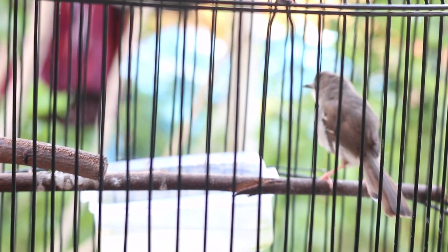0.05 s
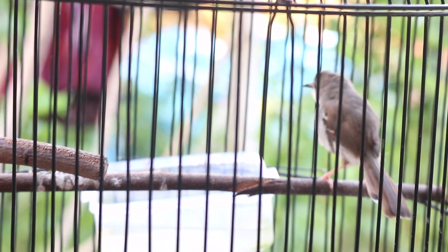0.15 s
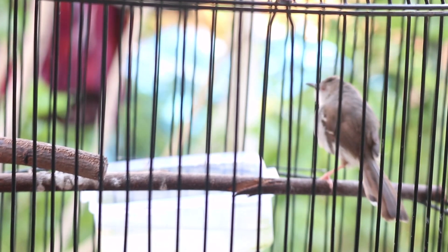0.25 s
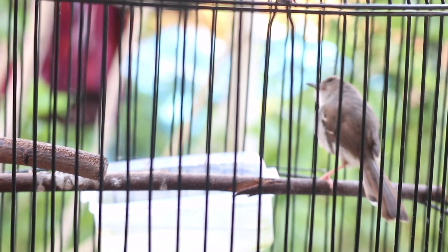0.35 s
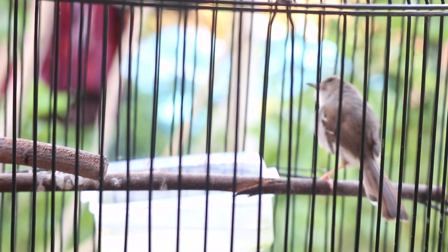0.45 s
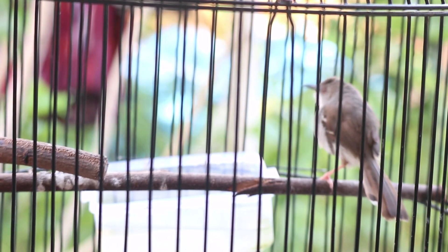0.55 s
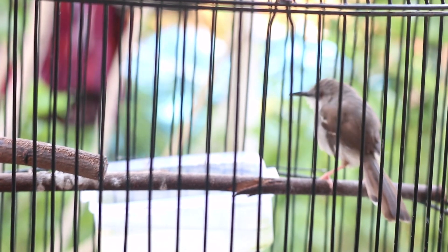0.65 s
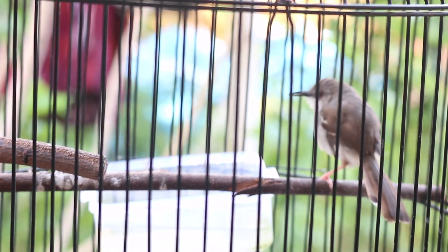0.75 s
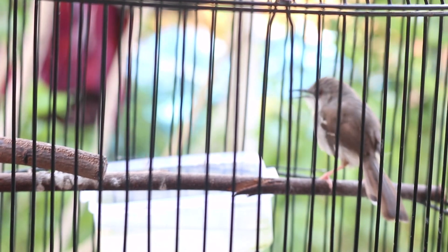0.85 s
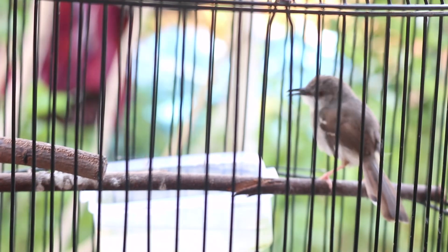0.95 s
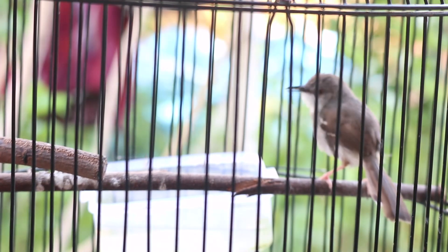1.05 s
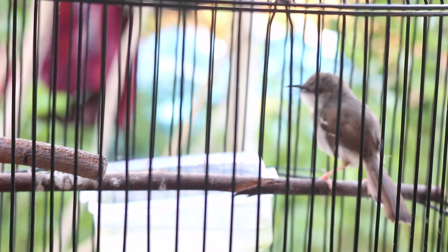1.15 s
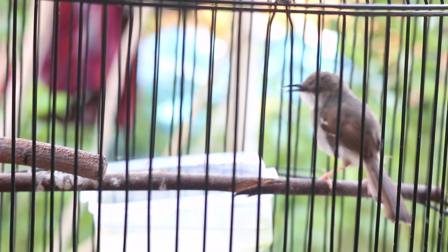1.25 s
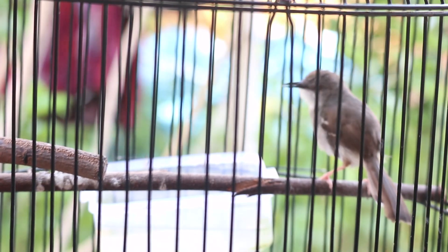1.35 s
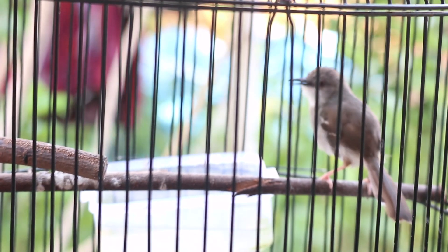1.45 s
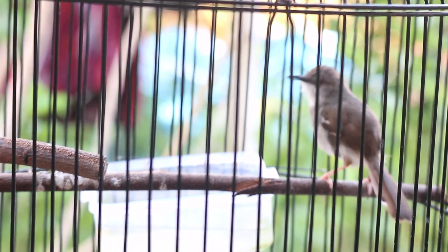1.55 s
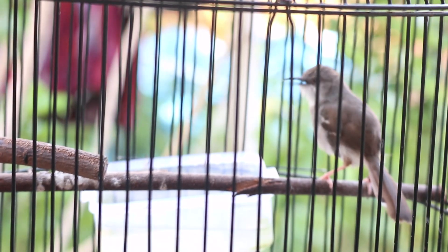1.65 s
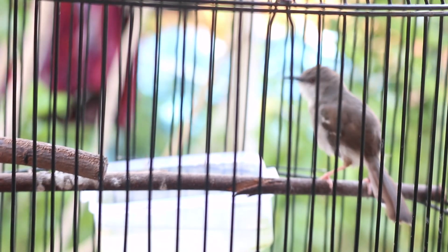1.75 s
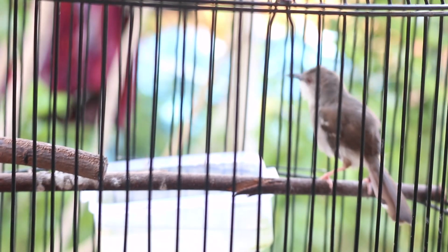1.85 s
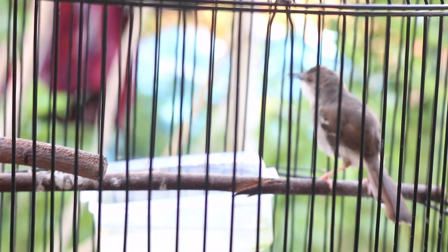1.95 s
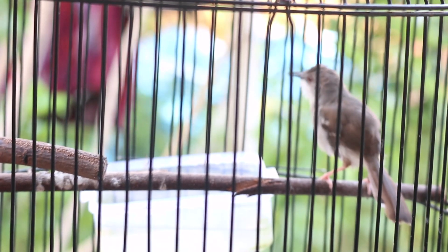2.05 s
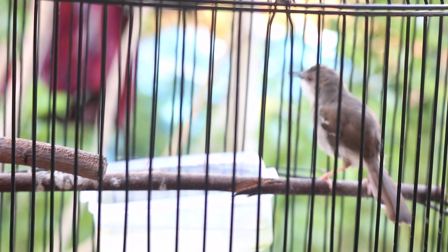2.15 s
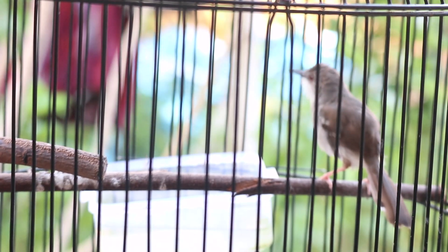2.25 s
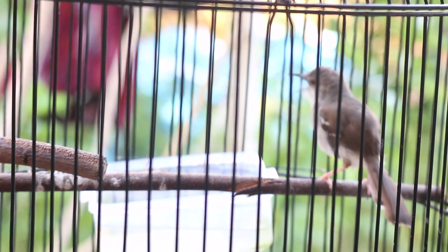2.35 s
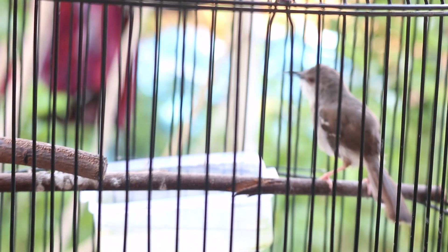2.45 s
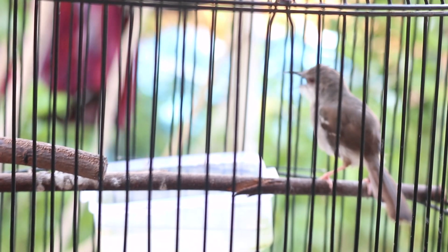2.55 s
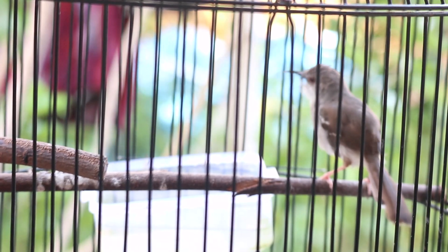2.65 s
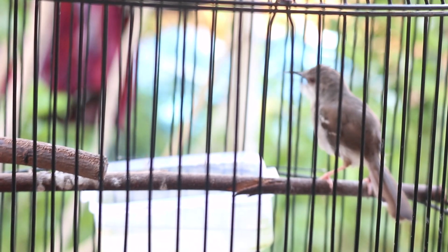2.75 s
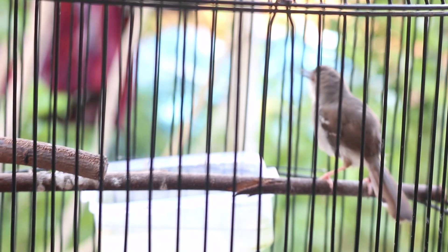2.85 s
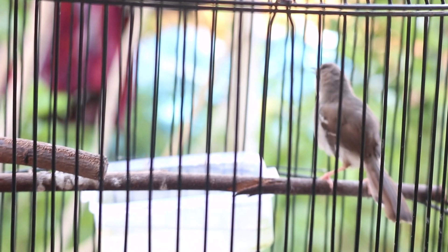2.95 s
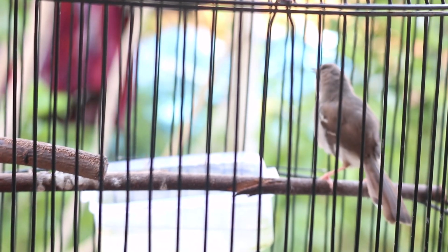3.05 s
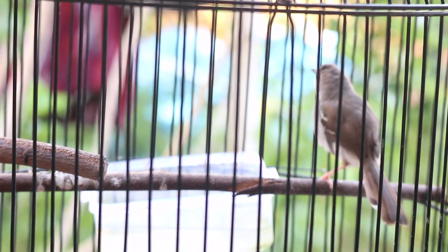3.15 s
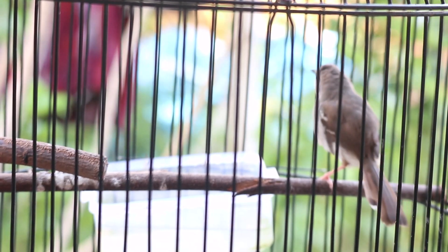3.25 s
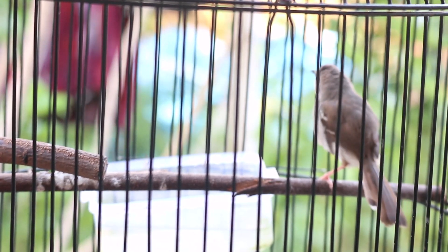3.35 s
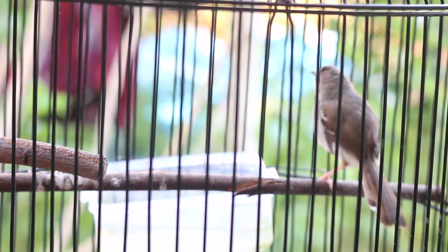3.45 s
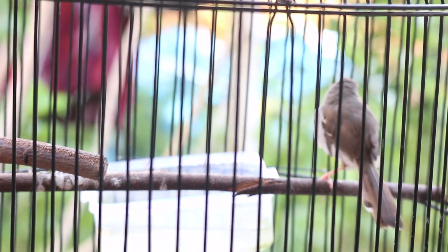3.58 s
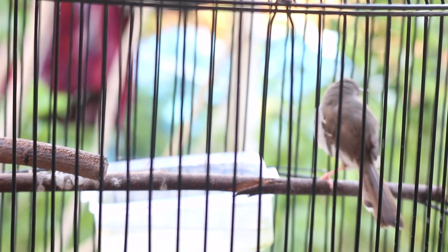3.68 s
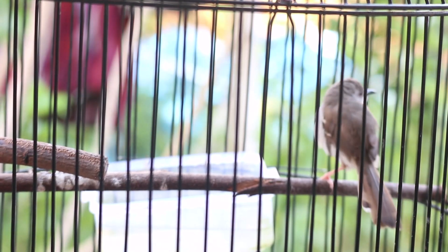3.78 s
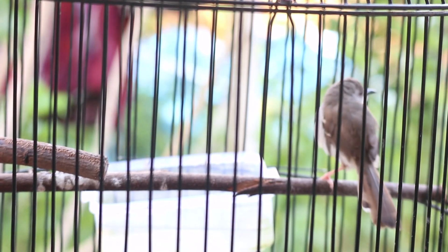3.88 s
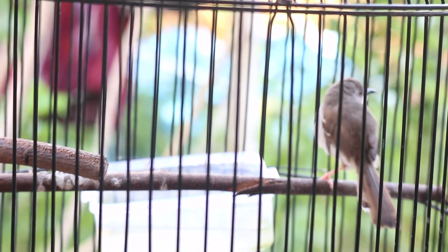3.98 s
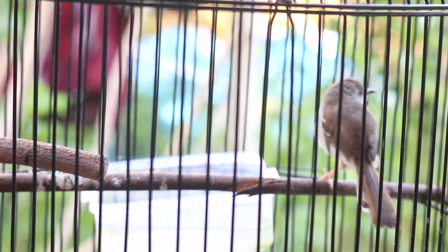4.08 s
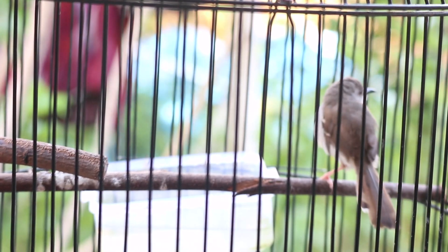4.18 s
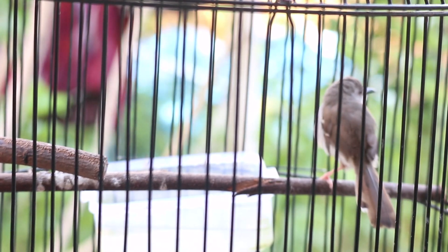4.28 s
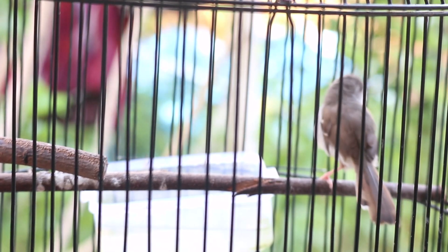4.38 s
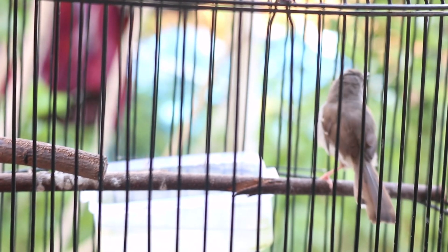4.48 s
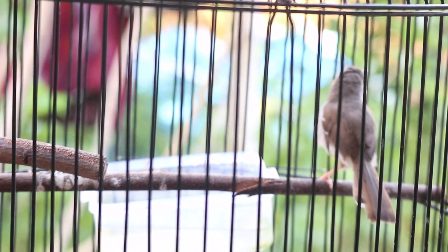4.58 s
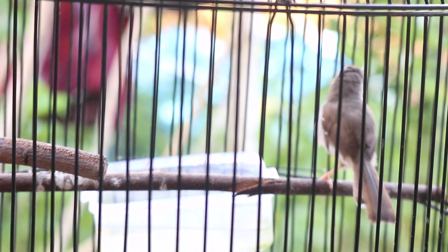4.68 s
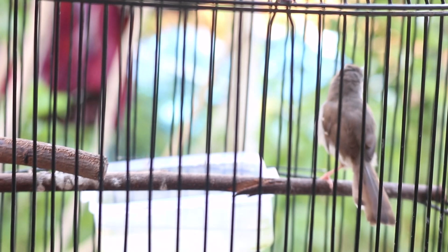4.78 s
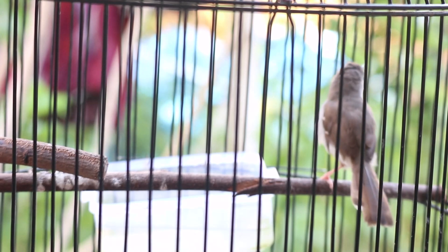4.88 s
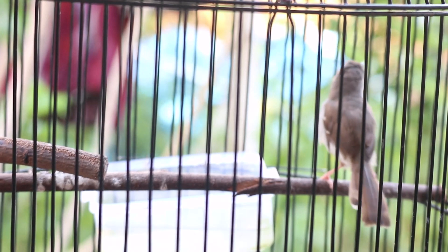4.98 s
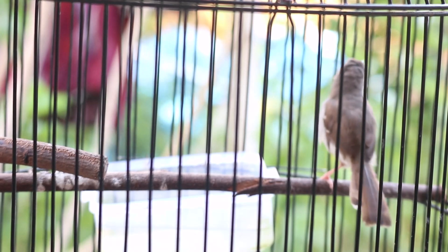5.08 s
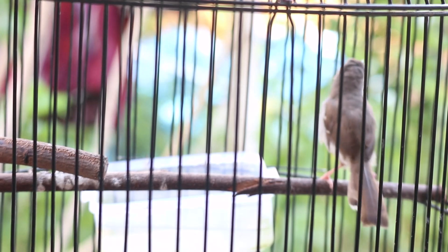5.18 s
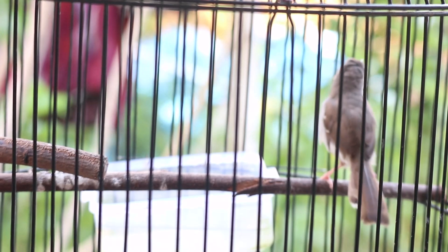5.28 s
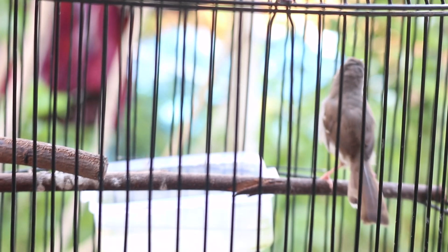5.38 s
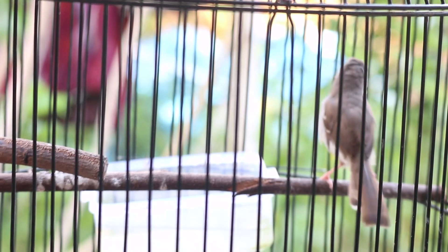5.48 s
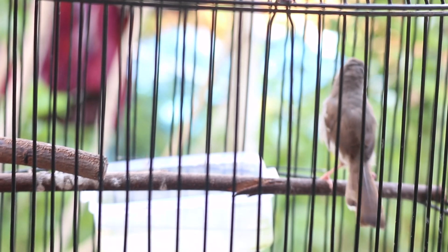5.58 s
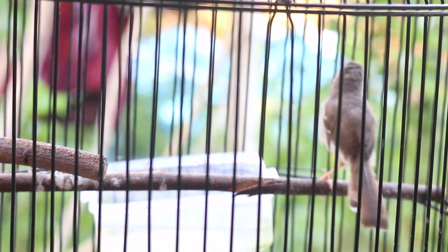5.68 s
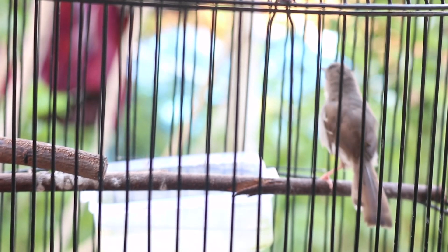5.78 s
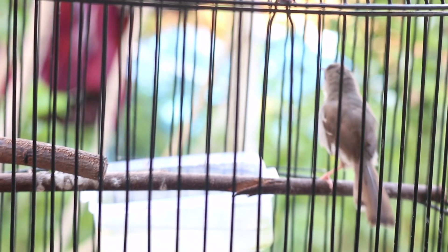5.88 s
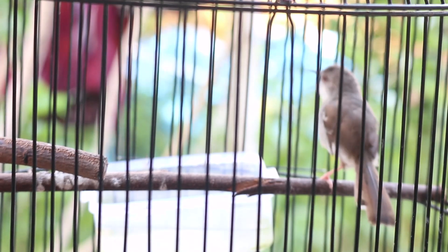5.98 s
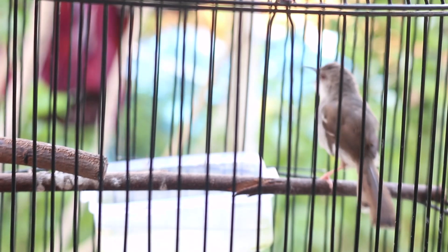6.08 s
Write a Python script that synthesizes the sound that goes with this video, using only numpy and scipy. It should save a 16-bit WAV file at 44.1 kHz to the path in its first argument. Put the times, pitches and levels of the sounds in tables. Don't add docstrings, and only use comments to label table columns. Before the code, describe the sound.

From 0 s a quiet, low bed: a far-off engine idling unevenly, deep rumble, soft traffic and thin airy hiss. A tiny distant chip and low calls come in the first third of a second, with faint high peeps around 0.6-0.9 s. At 0.83 s the nearby small bird begins: a soft note dipping down, up and down, then two brighter hooked chirps at 1.0 and 1.15 s. From 1.3 to 2.9 s it trills sixteen sharp whistles, each sweeping swiftly from very high to lower, about ten a second, growing to full loudness. A pause follows, with the engine swelling slightly around 3.6 and 4.2 s. At 4.37 s the second song starts with three similar notes, slightly higher and quicker, then the trill runs from 4.8 s to the end near 6.1 s. Close hard walls add short reflections; the tone shifts subtly as the bird turns its head.

```python
import sys
import numpy as np
from scipy import signal
from scipy.fft import rfft, irfft, next_fast_len
from scipy.io import wavfile
from scipy.ndimage import uniform_filter1d, map_coordinates

SR = 44100
rng = np.random.default_rng(int(sys.argv[2]) if len(sys.argv) > 2 else 0)


def to_wav(sig):
    pcm = np.clip(np.atleast_2d(sig), -1, 1) * 32767
    pcm = np.round(pcm).astype(np.int16)
    wavfile.write(sys.argv[1], SR, pcm.T)


def gain_from_db(level_db):
    decades = np.asarray(level_db, float) / 20
    return 10 ** decades


N = 270333

# time in s, loudness in dB, load in dB (more load favours the upper order).
ENGINE_COURSE = [(0.0, -42.5, -17.5), (0.08, -51, -6.5), (0.75, -49.5, -9.5), (1.35, -49.5, -4.5),
                 (1.43, -48, -14), (2.05, -49, -7), (2.08, -52.5, -7.5), (2.85, -47, -16),
                 (3.12, -49.5, -6.5), (3.52, -48, -10.5), (3.62, -41.5, -4), (3.86, -47.5, -5),
                 (3.93, -43, -17), (4.06, -44, -3.5), (4.22, -40, -1.5), (4.78, -43.5, -8),
                 (6.03, -40.5, -7), (6.13, -42.5, -10)]
# frequency in Hz, level in dB under the loudness, dB of shift per dB of load.
STRONG_ORDERS = [(58.3, -11, 0.01), (111.2, -5.5, -0.31), (142.2, -7.5, .9)]
# frequency in Hz, level in dB.
WEAK_ORDERS = [(86, -6), (172, 1), (200, 0), (260, -9)]
# frequency in Hz, density in dB per Hz.
DRONE_SPECTRUM = [(91, -24), (155, -0.5), (209, -8.5), (226, -13.5), (300, -12), (390, -43), (660, -120)]
DEEP_SPECTRUM = [(9, -30.5), (20, -9.5), (30, -7.5), (45, -1), (65, -0.5), (85, 0.5), (110, -1.5),
                 (150, -5), (170, -20), (300, -120)]
TRAFFIC_SPECTRUM = [(140, -37), (230, -7.5), (262, -3), (375, -4.5), (704, -10), (998, -11), (1690, -19.5),
                    (2500, -30.5), (3250, -63.5), (5500, -120)]
AIR_SPECTRUM = [(700, -25), (1200, -8), (1700, -7.5), (2800, -9.5), (4000, -12), (5500, -14.5), (7000, -16),
                (8500, -16.5), (9900, -15.5), (11000, -27), (14000, -49.5), (20000, -70)]
# time in s, level in dB.
AIR_LEVEL = [(0.0, -57), (6.13, -60)]
# frequency in Hz, correlation from -1 to 1.
OPEN_LIKENESS = [(40, 1), (120, 0.992), (220, 0.958), (430, .63), (820, 0.37), (1570, .07), (3030, 0),
                 (5820, -0.31), (10000, -0.37)]

# start in s, length in s, resting pitch in Hz, bend as a pitch ratio,
# level in dB.
FAR_CALLS = [
    (.05, .17, 790, .84, -63),
    (.225, .085, 878, 1, -62),
    (1.18, .48, 725, 1.07, -69),
    (.59, .13, 2760, 1, -60),
    (.76, .14, 2760, 1, -57),
    (.038, .005, 2300, 1.8, -39),
    (.043, .022, 1880, 1.04, -49),
]
FAR_ARCH = (4.38, .36, 1050, 1.155, -53)

# start in s, level in dB, pitch scale, time stretch.
DIP_NOTES = [
    (0.8282, -24, .99, 1.053),
    (4.371, -23.5, 1.06, .88),
]
# time in ms, pitch in Hz, level in dB.
DIP_COURSE = [(0, 4960, -41), (1.5, 4400, -1), (6.535, 3000, -0.5), (12.36, 2150, -2), (21.03, 1950, -7),
              (27.58, 2400, 2.5), (34.92, 3000, 0.5), (42.6, 2550, -1), (55.76, 1242, -26)]
# time in ms, level in dB.
DIP_OVERTONE = [(2, -30.5), (11, -5), (24, -38)]
# time of the top in s, level in dB, top pitch in Hz, time stretch.
HOOK_NOTES = [
    (1.014, -15.5, 3676, 1.036),
    (1.155, -13, 3912, 1.03),
    (4.543, -14, 3770, 1.01),
    (4.672, -12.5, 4080, .99),
]
# time from the top in ms, share of the way from base to top pitch,
# level in dB.
HOOK_COURSE = [(-13, -0.062, -43.5), (-6.5, .24, -19.5), (-2.5, .93, -5.5), (-1, 1, -1), (9, .71, 0),
               (16, .4, -3.5), (26.5, 0.1505, -14), (32, 0.0565, -31), (35, -0.45, -48.5)]
# time in s at which the pitch falls through the middle, level in dB, time stretch.
TRILL_NOTES = [(1.2873, -15.5, 1.14), (1.4002, -13, 0.933), (1.5026, -11.5, 0.865), (1.6034, -11, 0.96),
               (1.7056, -10.5, 0.95), (1.8086, -11, 0.878), (1.9132, -10.5, 0.89), (2.0169, -10.5, 0.9),
               (2.123, -10.5, 1.0), (2.2283, -9.5, 0.95), (2.3346, -10, 0.878), (2.4409, -10.5, 0.925),
               (2.5509, -10, 0.934), (2.6619, -10.5, 0.975), (2.7719, -10, 1.035), (2.8782, -10.5, 1.1),
               (4.8289, -16.5, 1.068), (4.9371, -13, 0.912), (5.0418, -11, 1.046), (5.143, -11, 1),
               (5.2444, -10.5, 1.046), (5.3489, -10, 1.2), (5.4513, -10, 1.022), (5.5553, -9.5, 1.0),
               (5.6636, -10, 0.87), (5.7741, -10, 0.987), (5.8821, -10.5, 0.978), (5.9879, -9, 0.929),
               (6.0954, -10, 1.05)]
# time from the middle in ms, pitch in Hz, level in dB.
FALL_COURSE = [(-14.5, 6950, -8), (-6, 5472.2, 3), (-3.5, 4750, 2), (3.5, 3438, 0.5), (9.5, 2424, -2.5),
               (12, 2119, -8.5), (15, 1827, -15.5), (24, 1375, -33.5), (31, 1100, -60)]
# frequency in Hz, gain in dB.
WINDPIPE = [(2500, -17.5), (3500, -6.5), (4500, 3), (5500, 0), (7000, -6.5), (9000, -10.5), (12000, -5),
            (14000, -1), (16000, -15)]

# start in s, delay of the bounce off the feeder in ms, its level in dB, left-right in dB.
HEAD_POSES = [
    (0, .62, -8.5, -0.52),
    (1.35, 0.648, -9, -0.5),
    (2.3, 0.617, -10, -0.5),
    (3.2, .62, -9, 0),
    (4.3, 0.43, -14, -0.93),
    (4.9, 0.291, -23, -1.04),
    (5.72, 0.617, -19.5, 0),
]
# delay in ms, level in dB over the tail.
WALL_ECHOES = [(5.5, 3.5), (8.6, 4), (12.6, 5.5), (17.6, -1), (21.6, 4.5), (25.1, -1), (33.1, 1.5),
               (47.6, -4), (67.1, -5)]
# frequency in Hz, time to fall 60 dB in s.
EARLY_DECAY = [(1200, 0.1936), (2500, 0.1748), (4000, 0.183), (6000, 0.1753), (12000, 0.1483)]
LATE_DECAY = [(1200, 0.48), (2500, 0.3704), (4000, 0.468), (6000, 0.335), (12000, 0.29)]
# frequency in Hz, correlation from -1 to 1.
WALL_LIKENESS = [(1000, 0.97), (2000, 0.809), (4000, 0.51), (6000, 0.252), (12000, 0.14)]
# frequency in Hz, gain in dB.
WALL_COLOUR = [(1200, 3.5), (1800, 4), (2300, -3), (3000, 1), (4000, 0), (5500, 0.5), (8000, 1.5),
               (12000, 3.5), (16000, 0)]

# frequency in Hz, gain in dB.
MIC_RESPONSE = [(20, -6), (45, -1.5), (60, 0), (11500, 0), (13500, -2.5), (16000, -16.5), (20000, -40)]
# frequency in Hz, density in dB per Hz.
GRIT_SPECTRUM = [(1000, -29.5), (5000, -10.5), (7000, 7), (8500, 3.5), (11500, -1.5), (13000, -6),
                 (15500, -19.5), (20000, -50)]


def unit(x):
    return x / np.sqrt(np.mean(x ** 2) + 1e-20)


def along(points, hz):
    f, v = np.transpose(points)
    return np.interp(np.log(hz + 1), np.log(f + 1), v)


def curves(rows):
    s, *columns = np.transpose(rows)
    return [np.interp(np.arange(N) / SR, s, column) for column in columns]


def wobble(rate, count=N):
    knots = rng.standard_normal(size=256)[:int(count * rate / SR) + 4]
    fine = np.arange(8 * len(knots)) / 8
    return np.interp(np.arange(count) * rate / SR, fine, map_coordinates(knots, [fine]))


def pair(z, likeness):
    hz = np.linspace(0, SR / 2, z.shape[1])[:, None]
    angle = np.arccos(np.clip(along(likeness, hz), -1, 1)) / 2
    common = z[0] * np.cos(angle)
    opposed = z[1] * np.sin(angle)
    return np.array([common + opposed, common - opposed]), hz


def coloured(x, points):
    size = next_fast_len(N + 4096)
    gain = gain_from_db(along(points, np.fft.rfftfreq(size, 1 / SR)))
    return irfft(rfft(x, size) * gain, size)[:, :N]


def rush(spectrum, patchy_db):
    noise = signal.stft(rng.standard_normal((2, N)), nperseg=4096)[2]
    z, hz = pair(noise, OPEN_LIKENESS)
    patches = uniform_filter1d(rng.standard_normal(z.shape[1:]), size=20, axis=0)
    patches = unit(uniform_filter1d(patches, size=2, axis=1))
    z = z * gain_from_db(along(spectrum, hz) + patchy_db * patches)
    return unit(signal.istft(z, nperseg=4096)[1][:, :N])


def engine(loudness_db, load_db):
    clock = np.cumsum(1 + 0.012 * wobble(2.2)) / SR

    def order(hz):
        gain = gain_from_db(3 * wobble(9))
        return gain * np.sin(2 * np.pi * hz * clock + 1.3 * wobble(8))

    extra_load = load_db - load_db.mean()
    strong = sum(gain_from_db(loudness_db + db + lean * extra_load) * unit(order(hz)) for hz, db, lean in STRONG_ORDERS)
    weak = unit(sum(gain_from_db(db + 3.6 * wobble(2.3)) * order(hz) for hz, db in WEAK_ORDERS))
    exhaust = rush(DRONE_SPECTRUM, patchy_db=1.59)
    return strong + gain_from_db(loudness_db - 8) * (gain_from_db(-4) * weak + gain_from_db(-0.42) * exhaust)


def street():
    loudness_db, load_db = curves(ENGINE_COURSE)
    traffic_db = -58 + 0.335 * (loudness_db - loudness_db.mean())
    traffic = gain_from_db(traffic_db + 2.5 + 0.4 * wobble(3.9)) * rush(TRAFFIC_SPECTRUM, patchy_db=1.4957)
    hiss = gain_from_db(curves(AIR_LEVEL)[0] + 0.5 * wobble(5.7)) * rush(AIR_SPECTRUM, patchy_db=2.0)
    rumble = gain_from_db(-51) * rush(DEEP_SPECTRUM, patchy_db=1.02)
    return engine(loudness_db, load_db) + rumble + traffic + hiss


def add_whistle(track, s, hz, db, overtones_db, waver=0.013, breath_db=-52):
    start = int(s[0] * SR)
    t = np.arange(start, min(int(s[-1] * SR), N)) / SR

    def smooth(values):
        return uniform_filter1d(np.interp(t, s, values), size=45, mode="nearest")

    pitch = smooth(hz) * (1 + waver * wobble(300, count=len(t)))
    phase = 2 * np.pi * (np.cumsum(pitch) / SR + rng.random())
    breath = np.diff(rng.standard_normal(size=SR)[:len(t) + 1])
    tone = np.sin(phase) + gain_from_db(breath_db) * breath
    for k, over_db in enumerate(overtones_db, 2):
        shaky_db = along(WINDPIPE, k * pitch) + 1.7 * wobble(250, count=len(t))
        tone = tone + gain_from_db(smooth(over_db + 0 * s) + shaky_db) * np.sin(k * phase)
    track[start:start + len(t)] += np.sqrt(2) * gain_from_db(smooth(db)) * tone


def far_birds():
    calls = np.zeros(N)
    u = np.linspace(0, 1, num=41)
    to_end = np.minimum(u, 1 - u)
    swell_db = -19 * np.clip(1 - to_end / 0.14, 0, 1)
    arch = np.sin(np.pi * u) ** 1.3
    settle = (1 - u) ** 2
    shapes = [arch] + [settle] * len(FAR_CALLS)
    for (s, length, hz, bend, db), shape in zip([FAR_ARCH] + FAR_CALLS, shapes):
        pitch = hz * (1 + (bend - 1) * shape)
        add_whistle(calls, s + u * length, pitch, db + swell_db, [-16], waver=16 / hz)
    calls = calls * gain_from_db(-2.5 + 2 * wobble(30))
    echoes = signal.fftconvolve(calls[None], walls(), axes=1)[:, :N]
    return 0.7 * calls + 0.6 * echoes


def dip_note(song, s, level_db, scale, stretch):
    ms, hz, db = np.transpose(DIP_COURSE)
    over_db = np.interp(ms, *np.transpose(DIP_OVERTONE))
    add_whistle(song, s + ms * stretch / 1000, hz * scale, level_db + db - 4.5, [over_db, -36])


def hook_note(song, s, level_db, top_hz, stretch):
    base_hz = 1793
    ms, share, db = np.transpose(HOOK_COURSE)
    over_db = np.where(ms < -3, 4, -29.5)
    pitch = base_hz + share * (top_hz - base_hz)
    add_whistle(song, s + ms * stretch / 1000, pitch, level_db + db - 4.5, [over_db + 2, -36])


def trill_note(song, s, level_db, stretch):
    ms, hz, db = np.transpose(FALL_COURSE)
    fine = np.arange(ms[0], ms[-1], 0.25)
    below_full_db = level_db + 10
    lead_ms = 9.22 + 0.7187 * below_full_db
    before_onset = np.minimum(fine * stretch + lead_ms - 2.4, 0)
    swell = 3 * np.exp(0.1 * below_full_db)
    swell_db = np.maximum(-swell * before_onset ** 2, -70)
    depth = 0.9065 + 0.023 * (9 - lead_ms) + 0.21 * rng.random()
    fray_db = 0.913 + 0.1293 * np.maximum(fine - 8, 0)
    shape_db = np.interp(fine, ms, db) * depth + fray_db * wobble(SR / 16, count=len(fine))
    pitch = np.interp(fine, ms, hz)
    add_whistle(song, s + fine * stretch / 1000, pitch, level_db - 4 + swell_db + shape_db, [-26, -32, -38])


def warbler():
    song = np.zeros(N)
    for dip, hooks in zip(DIP_NOTES, np.split(np.array(HOOK_NOTES), 2)):
        dip_note(song, *dip)
        for hook in hooks:
            hook_note(song, *hook)
    for note in TRILL_NOTES:
        trill_note(song, *note)
    return song


def walls():
    size = int(SR * 0.4)
    noise = signal.stft(rng.standard_normal((2, size)), nperseg=128)[2]
    z, hz = pair(noise, WALL_LIKENESS)
    z = z * gain_from_db(along(WALL_COLOUR, hz))
    t = np.arange(z.shape[2]) * 64 / SR
    early = gain_from_db(-60 * t / along(EARLY_DECAY, hz))
    late = gain_from_db(-16.5 - 60 * t / along(LATE_DECAY, hz))
    tail = signal.istft(z * (early + late), nperseg=128)[1][:, :size]
    ms = np.arange(size) / SR * 1000
    echoes_db = sum(db * np.exp(-((ms - at) / 0.9) ** 2) for at, db in WALL_ECHOES)
    tail = tail * gain_from_db(echoes_db) * np.clip((ms - 2.2) / 1.8, 0, 1)
    return tail / np.sqrt(np.sum(tail ** 2) / 2)


def porch(song):
    out = np.zeros((2, N + SR))
    common = walls()
    size = next_fast_len(2 * SR)
    hz = np.fft.rfftfreq(size, 1 / SR)
    side = np.array([[0.5], [-0.5]])
    left_lag_ms = 0.012 * (side + 0.5)
    ends = [pose[0] for pose in HEAD_POSES[1:]] + [N / SR]
    for (s, bounce_ms, bounce_db, pan_db), end in zip(HEAD_POSES, ends):
        direct = gain_from_db(pan_db * side) * np.exp(-2j * np.pi * hz * left_lag_ms / 1000)
        delay = np.exp(-2j * np.pi * hz * bounce_ms / 1000)
        bounce = 1 + gain_from_db(bounce_db + 1.0) * delay / (1 + (hz / 5200) ** 4)
        answer = gain_from_db(-3) * rfft(0.565 * common + 0.852 * walls(), size)
        start = int(s * SR)
        sung = rfft(song[start:int(end * SR)], size)
        heard = irfft(sung * (direct * bounce + answer), size)[:, :N + SR - start]
        out[:, start:start + heard.shape[1]] += heard
    return out[:, :N]


def scene():
    return street() + far_birds() + porch(warbler())


def top_cut(x):
    return signal.sosfilt(signal.butter(12, 15800, fs=SR, output="sos"), x)


def record(dry):
    loudness = np.sqrt(np.abs(uniform_filter1d(dry ** 2, size=200, axis=1)))
    grit_noise = unit(coloured(rng.standard_normal((2, N)), GRIT_SPECTRUM))
    grit = gain_from_db(-28) * loudness ** 1.444 * grit_noise
    t = np.arange(N) / SR
    level_dip = gain_from_db(-14 * np.exp(-((t - 0.223) / 0.004) ** 2))
    return top_cut((coloured(dry, MIC_RESPONSE) + grit) * level_dip)


dry = scene()
out = record(dry)
to_wav(out)
```